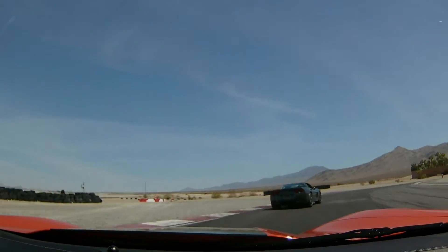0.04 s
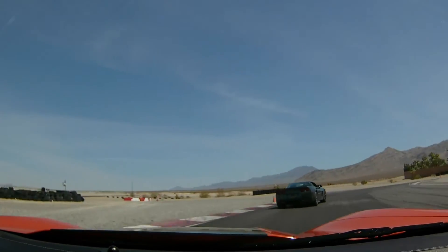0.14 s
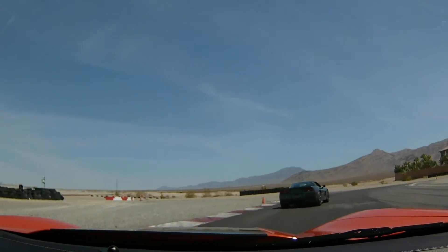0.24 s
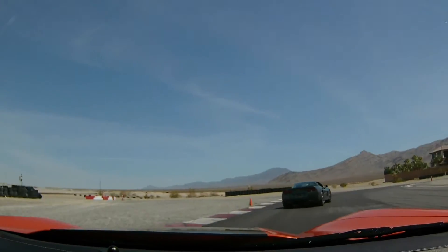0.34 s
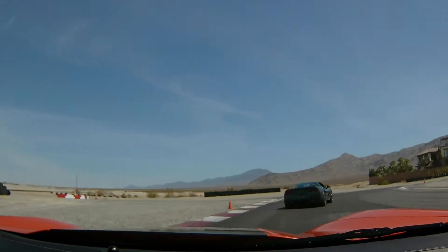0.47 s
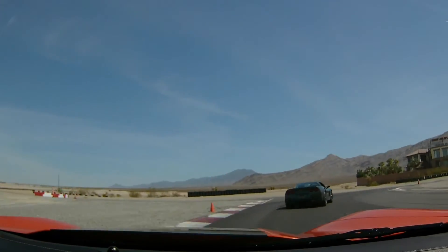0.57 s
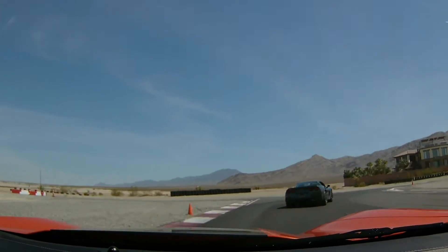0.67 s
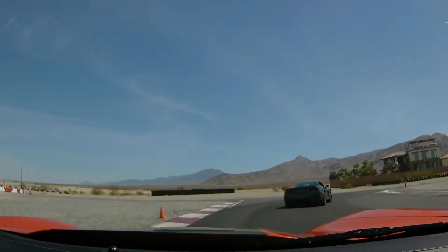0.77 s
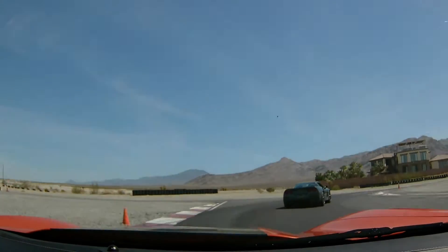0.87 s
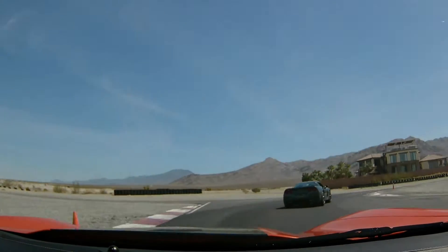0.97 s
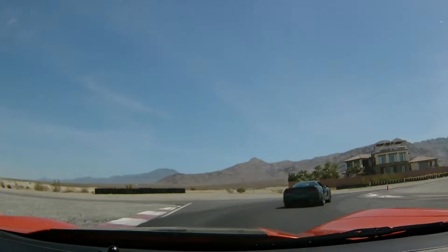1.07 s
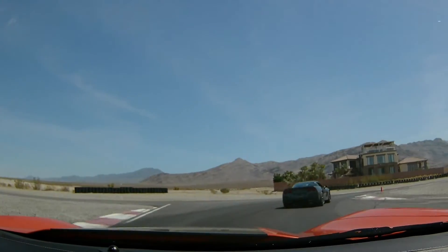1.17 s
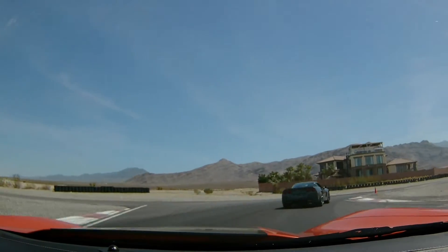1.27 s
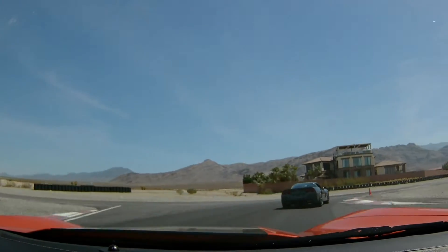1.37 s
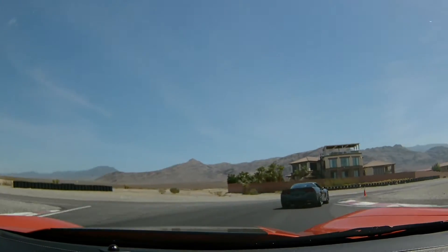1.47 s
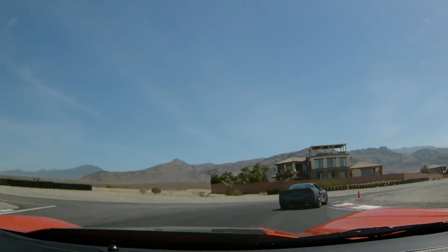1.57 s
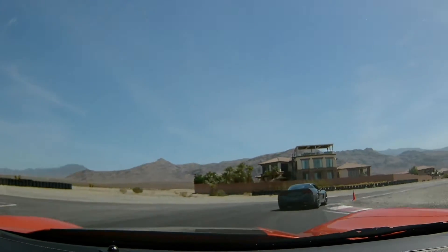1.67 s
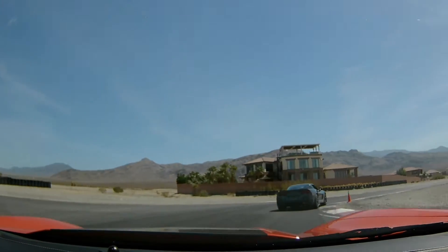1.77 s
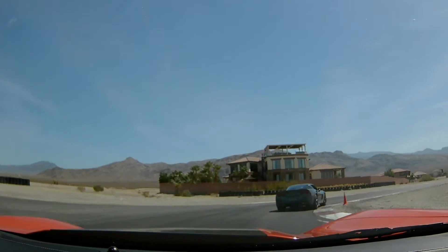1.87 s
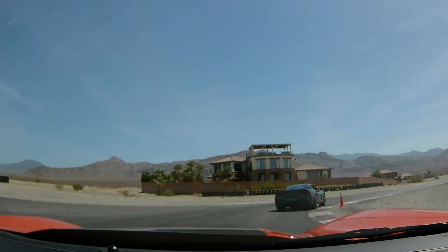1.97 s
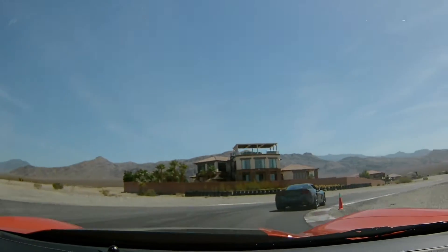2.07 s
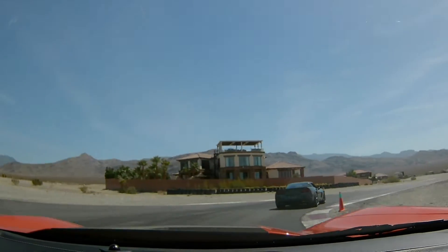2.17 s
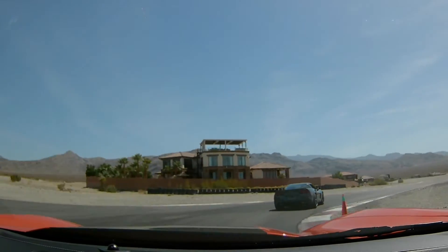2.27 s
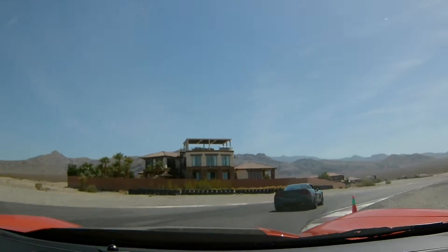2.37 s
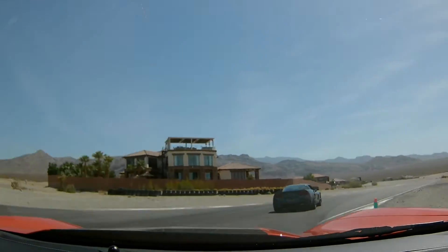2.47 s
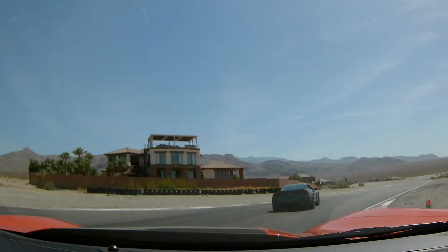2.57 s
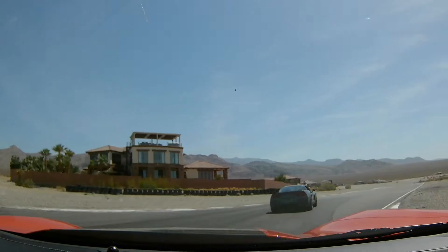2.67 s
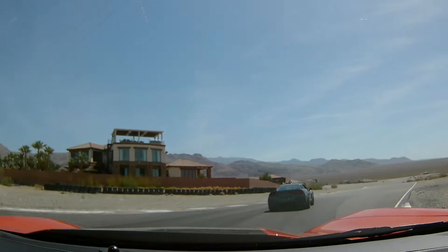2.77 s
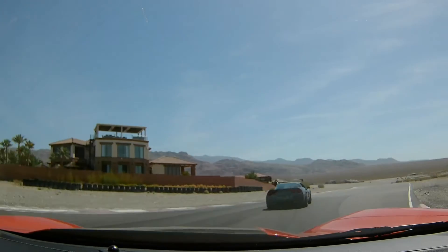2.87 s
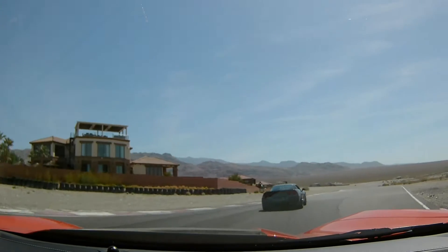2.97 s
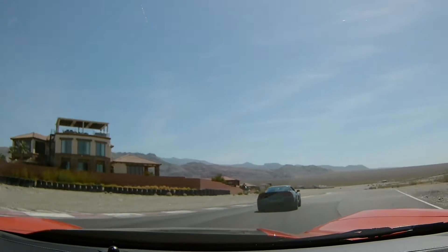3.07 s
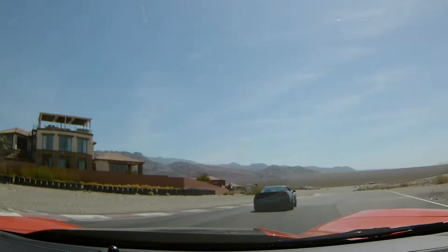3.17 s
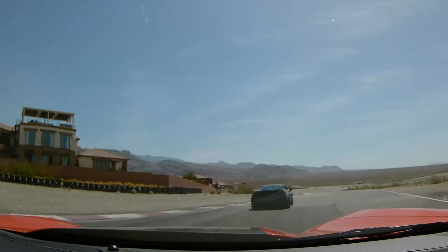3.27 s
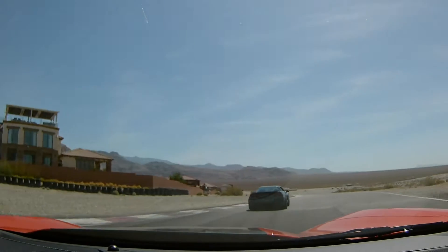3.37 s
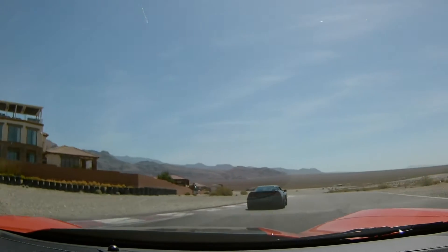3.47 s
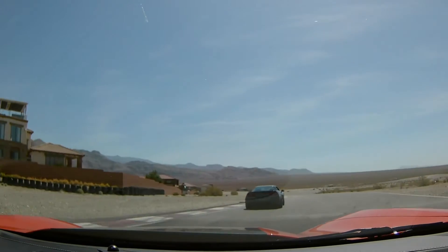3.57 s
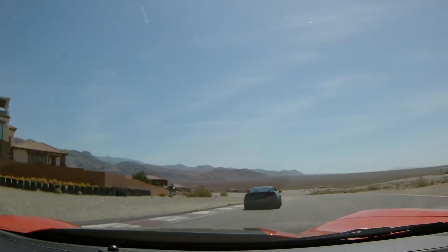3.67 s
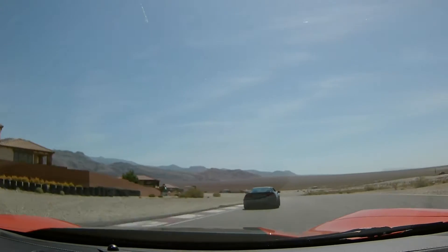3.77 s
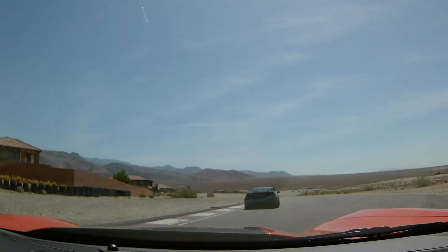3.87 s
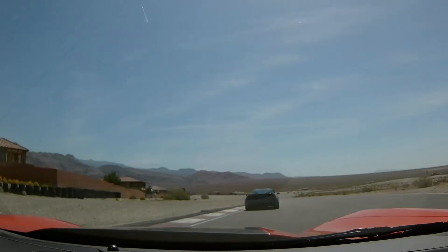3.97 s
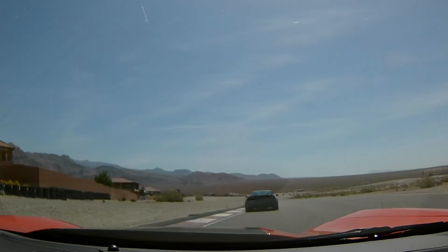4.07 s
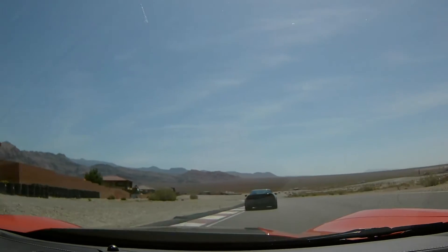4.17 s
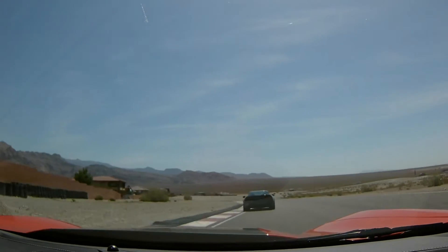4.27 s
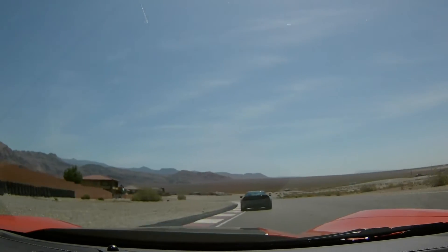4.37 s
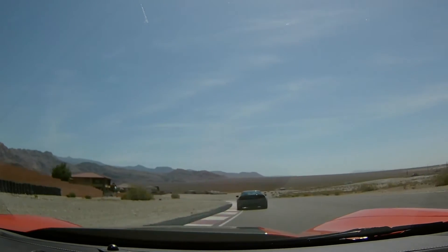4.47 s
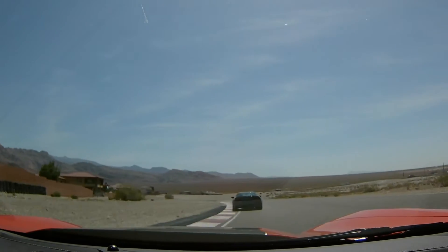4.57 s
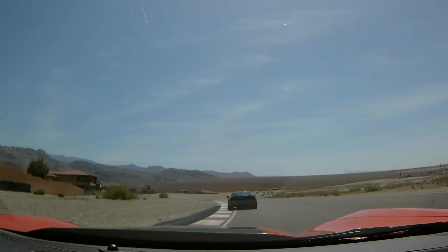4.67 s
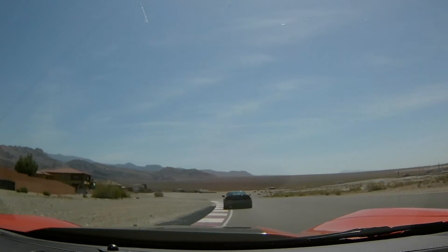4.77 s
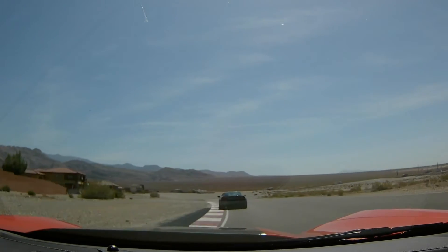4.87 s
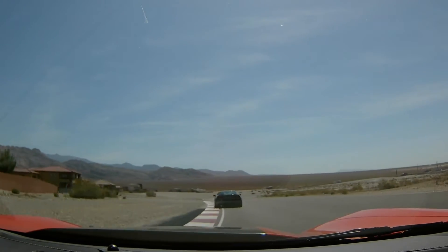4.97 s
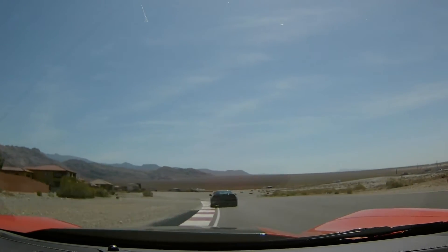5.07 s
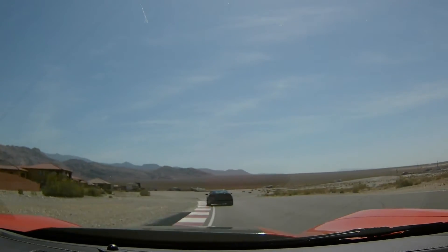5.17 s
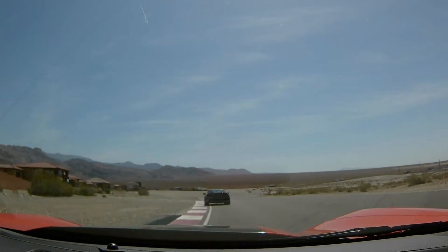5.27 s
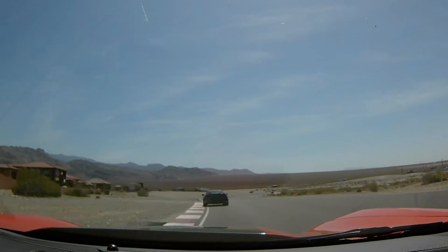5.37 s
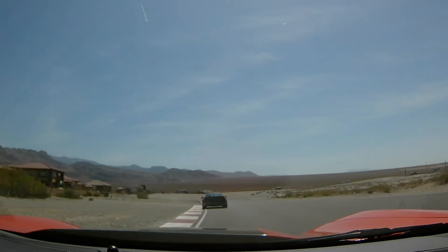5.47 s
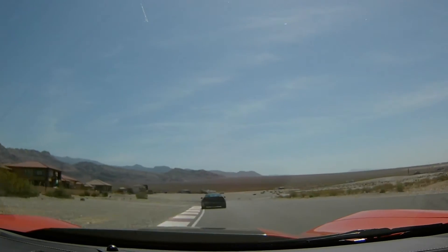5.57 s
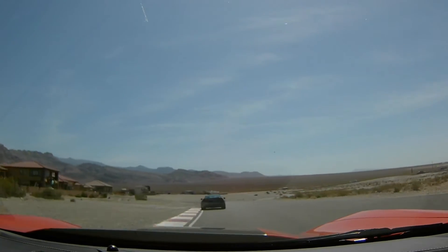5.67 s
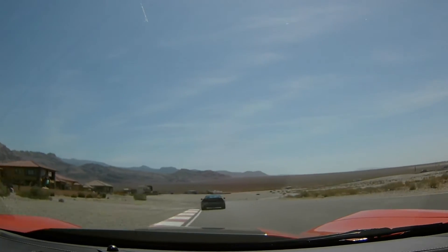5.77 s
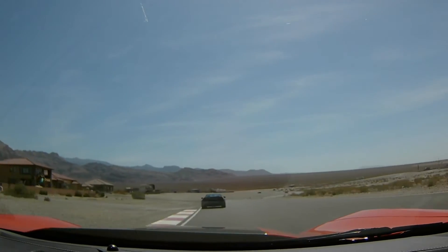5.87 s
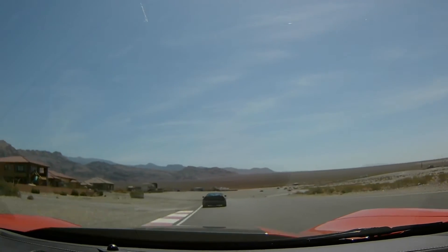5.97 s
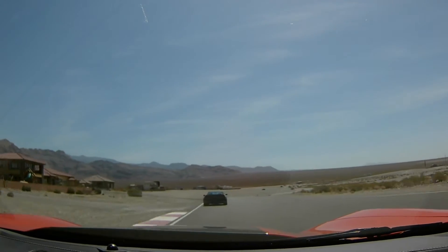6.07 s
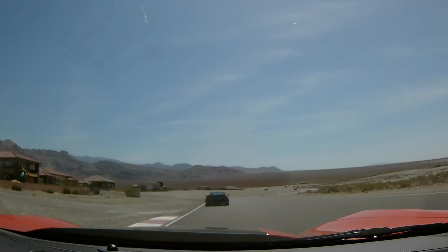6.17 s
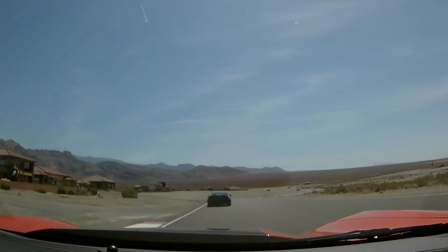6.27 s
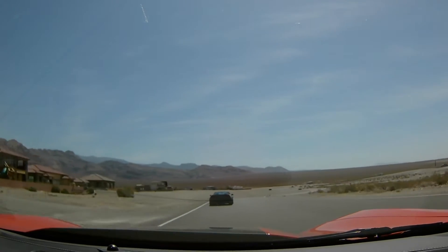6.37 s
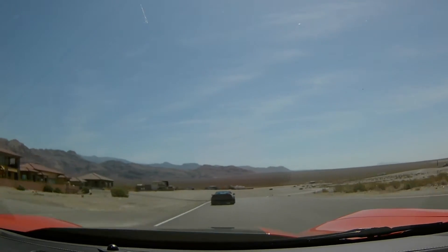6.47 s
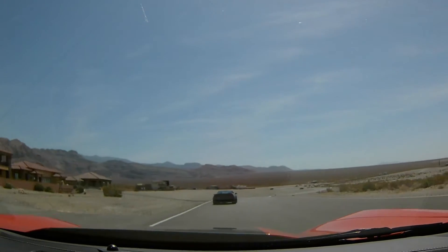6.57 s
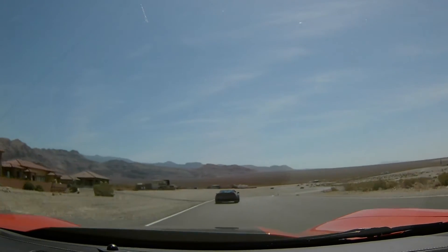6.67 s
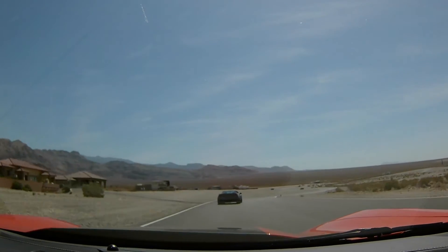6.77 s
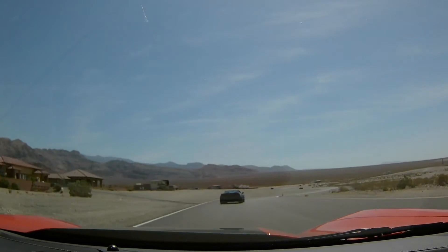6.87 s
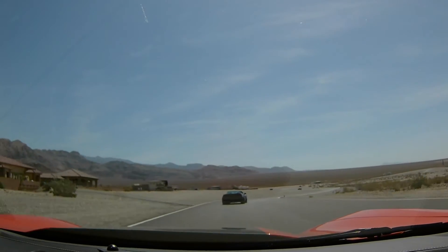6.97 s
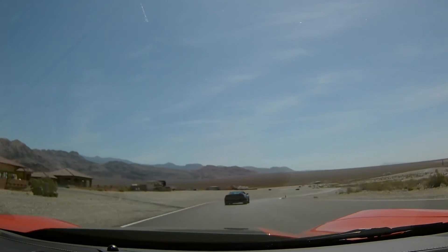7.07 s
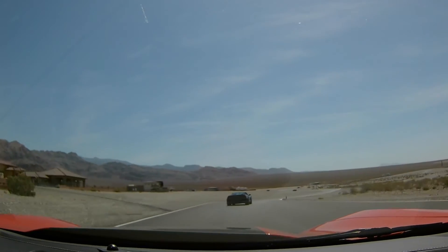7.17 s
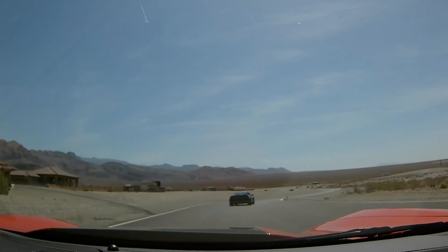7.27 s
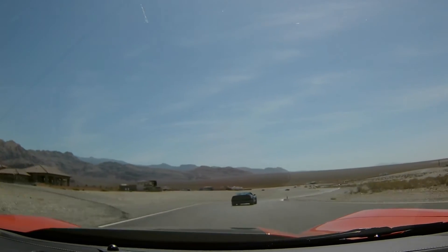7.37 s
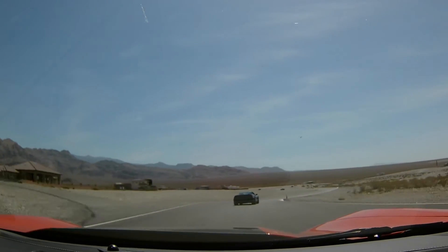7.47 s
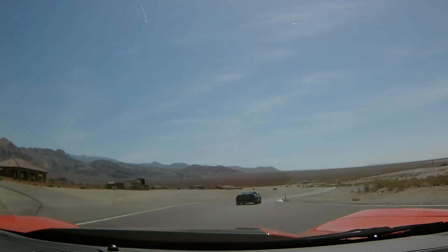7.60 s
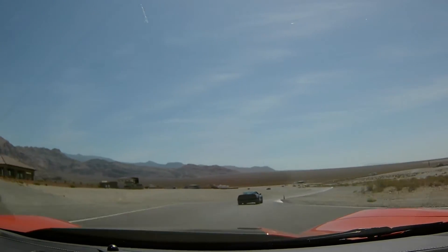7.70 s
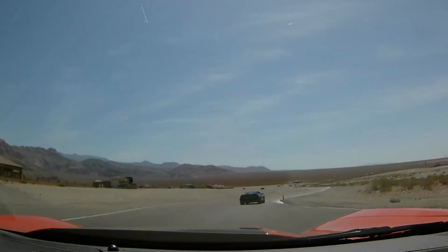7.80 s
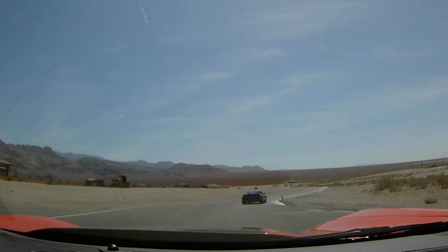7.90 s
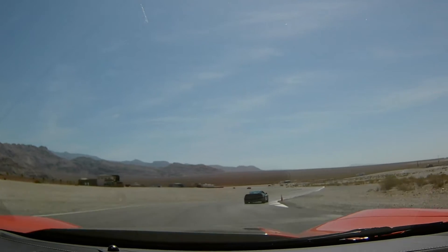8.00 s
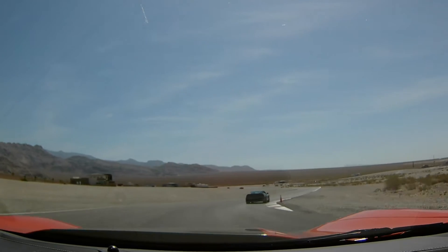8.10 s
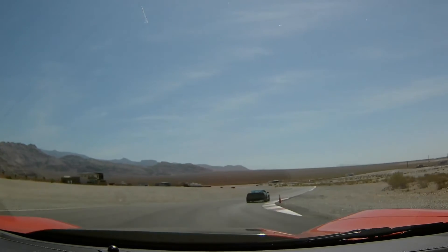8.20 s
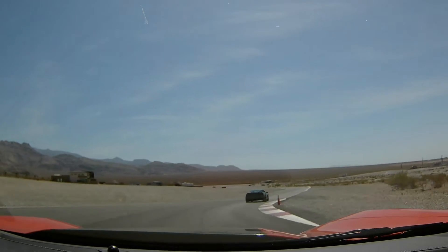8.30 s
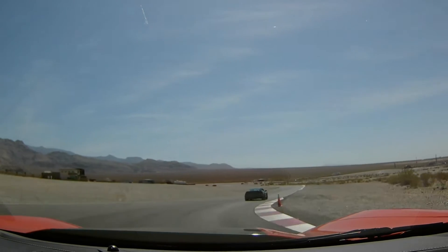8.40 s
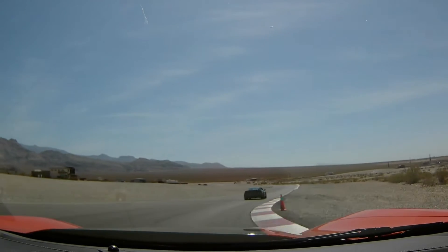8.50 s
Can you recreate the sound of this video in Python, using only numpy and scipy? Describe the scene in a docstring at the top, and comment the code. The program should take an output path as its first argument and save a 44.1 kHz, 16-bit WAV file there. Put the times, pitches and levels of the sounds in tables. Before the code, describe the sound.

Heard inside a sports car on a track: tyre roar and low rumble over a barely audible coasting engine, then the V8 comes in at part throttle through a bend with faint tyre squeals and one tiny trim click. It goes flat out, revs climbing in a booming snarl, drops in pitch at one quick upshift, climbs again, and eases off at the end. Wind grows with speed.

```python
"""A low, faint engine note coasts over tyre roar and road rumble; then a V8 sports car pulls through a bend at
part throttle and goes flat out with one quick upshift, all heard from the driver's seat.
The engine is a stack of sine harmonics locked to the crank, booming through resonances as the revs sweep.
Tyres, wind, floor drone and hiss are shaped noise; roar, wind and drone grow with speed.
Tyre squeals are narrow wavering bands; a piece of trim clicks once in the bend as a set of decaying modes."""
import sys
import numpy as np
from scipy import signal
from scipy.fft import rfft, irfft, next_fast_len
from scipy.io import wavfile
from scipy.ndimage import uniform_filter1d, minimum_filter1d

SR = 44100
rng = np.random.default_rng(int(sys.argv[2]) if len(sys.argv) > 2 else 0)


def transcribe(u):
    """Save the signal u as a 16-bit wav file named by the first command-line argument.

    u: samples, shape (n,) or (channels, n), limited to [-1, 1]; the rate is SR.
    q: integer samples, one column per channel.
    """
    v = np.clip(np.atleast_2d(u).T, -1, 1)
    q = np.round(v * 32767).astype(np.int16)
    wavfile.write(sys.argv[1], SR, q)


N = 376613
TIME = np.arange(N) / SR

# engine cycle = two crank turns = eight firings: (time [s], cycle rate [Hz])
CYCLE_RATE = [(0.0, 30.0), (0.24, 29.3), (0.43, 29.6), (0.69, 28.7), (0.9, 29.3), (1.05, 28.9),
              (1.93, 29.0), (2.78, 30.3), (3.57, 31.8), (3.71, 32.3), (4.83, 38.3), (5.56, 42.4),
              (6.25, 46.0), (6.35, 46.3), (6.42, 45.9), (6.45, 45.1), (6.52, 40.7), (6.57, 38.7),
              (6.59, 38.5), (6.78, 39.3), (8.11, 44.1), (8.23, 43.3), (8.47, 43.4), (8.54, 42.6)]
# coasting, part throttle in the bend, flat out, then easing off: (time [s], engine load [dB])
ENGINE_LOAD = [(0, -31), (.74, -31.5), (.89, -16.5), (1.6, -13), (2.85, -11), (3.35, -13), (3.6, -9.5),
               (3.85, -4), (4.4, 0), (6.4, 0), (6.65, -0.5), (7.3, 0), (8.1, 0), (8.3, -3), (8.54, -10.5)]
# strong harmonics of the cycle: 8, 16 and 24 are the firing note and its overtones,
# the rest the burble of the banks: (harmonic number)
STRONG_HARMONICS = (3, 4, 5, 6, 7, 8, 10, 14, 16, 24)
# each strong harmonic with no load: (level [dB])
COAST_LEVELS = [-42, -38.5, -49.5, -43, -44.5, -48.5, -45, -52.5, -52, -52.5]
# each strong harmonic at full load, between resonances: (level [dB])
PULL_LEVELS = [-38.5, -34, -37, -44, -36.5, -39, -41, -41.5, -40.5, -45]
# resonances each harmonic sweeps through, the same in every gear:
# harmonic number: (centre [Hz], width [Hz], level at full load [dB])
BOOM_RESONANCES = {3: [(103, 9.5, -28), (122.1, 23, -17)], 4: [(130.9, 16, -22), (167.3, 17, -29)],
                   5: [(190, 9, -28), (219.3, 19.8, -22.5)], 6: [(235.7, 48.5, -24), (274, 20, -23)],
                   7: [(249, 55, -29.5)], 8: [(237.4, 21, -13), (262, 15.3, -14.5), (280, 39, -20),
                   (313.2, 27.8, -19.5), (347, 19, -29.5), (373, 22, -17.5)], 10: [(337.7, 20, -25.5),
                   (377.3, 26, -27.5)], 14: [(486, 34, -32), (566.6, 52, -33)], 16: [(592, 23, -32.5),
                   (657, 49.6, -23.5), (724, 58, -29)], 24: [(1063, 78, -35.5)]}
# pipe colour of the weaker harmonics at full load: (frequency [Hz], level of each [dB])
PIPE_COLOUR = [(60, -38), (270, -32), (320, -38), (380, -32), (430, -38), (520, -37), (650, -39),
               (800, -39), (960, -46), (1070, -44), (1250, -49), (1780, -49), (1950, -61), (2600, -68)]
# harmonics that the uneven firing of each bank favours or starves: (harmonic number)
BANK_HARMONICS = (2, 9, 11, 12, 13, 15, 17, 18, 19, 20, 21, 22, 23, 25)
# how far each of those is favoured or starved: (gain [dB])
BANK_GAINS = [4.5, -4.5, 0, -2, -1, 2.5, -1.5, 2, -3, 2, 1, -2, 2, 2.5]
# tyre roar in the bend, shape only: (frequency [Hz], relative level [dB])
BEND_TYRE_SPECTRUM = [(60, -25), (140, -22), (280, -4), (370, -5.5), (480, 0.5), (590, -9.5), (700, 2),
                      (820, -4.5), (950, -10.5), (1300, -12.5), (1800, -17.5), (2000, -30.5), (2700, -37.5),
                      (4000, -61)]
# tyre roar at speed, shape only: (frequency [Hz], relative level [dB])
FAST_TYRE_SPECTRUM = [(60, -9.5), (130, -12), (300, 6.5), (420, 7), (560, 6.5), (750, 6.5), (950, 1),
                      (1300, 1), (1750, -3), (2000, -15), (2700, -13), (4000, -38)]
# wind and intake air, shape only: (frequency [Hz], relative level [dB])
WIND_SPECTRUM = [(800, -19.5), (1600, 0.5), (2200, 3.5), (2800, -1.5), (3300, -4), (4200, -8), (5000, -14),
                 (6000, -24), (8000, -26)]
# gusts that move the wind around its steady level: (time [s], gain [dB])
WIND_GUSTS = [(0, 1.5), (.35, 0.5), (1.6, 0), (2.2, 1.5), (2.9, 4), (3.5, 2), (4.3, -3.5), (4.85, 2.5),
              (5.8, -2.5), (6.2, -1), (7.2, -.5), (8.1, 0.5), (8.54, 1.5)]
# road noise through the floor, shape only: (frequency [Hz], relative level [dB])
DRONE_SPECTRUM = [(45, -9), (80, -3), (115, -1.5), (165, -1), (260, -5), (420, -25)]
# the body shaking, shape only: (frequency [Hz], relative level [dB])
RUMBLE_SPECTRUM = [(10, -22), (22, -8), (35, -1.5), (50, -7.5), (70, -13.5), (100, -20), (160, -23.5),
                   (260, -27), (500, -49)]
# how hard the road shakes the body: (time [s], level [dB])
ROAD_BUMPS = [(0, -27), (1.35, -31.5), (1.6, -26.5), (2.4, -19), (3, -22.5), (4.6, -24), (5.25, -18.5),
              (6, -22.5), (7, -18.5), (8.1, -15.5), (8.54, -16.5)]
# faint squeals in the bend, from the tyres scrubbing:
# (middle [s], length [s], pitch [Hz], rate of wavering [changes/s], level [dB])
TYRE_SQUEALS = [(0.948, 0.75, 1804, 25, -55.5), (2.65, 0.55, 802, 64.7, -39), (3.203, .5, 766, 70.7, -38.5)]
# the tiny slips that make up the trim click: (time [s], drive level [dB])
TRIM_SLIPS = [(2.8215, -34), (2.8302, -6), (2.8332, -24)]
# ringing modes of the trim: (frequency [Hz], relative level [dB], 60 dB decay time [s])
TRIM_MODES = [(1314, -11.5, 0.017), (2240, -2.5, 0.008), (2510, -2, 0.01), (2690, -16, 0.02),
              (3430, -24, .012), (4200, -28, 0.031)]
# faint top-treble hiss, shape only: (frequency [Hz], relative level [dB])
HISS_SPECTRUM = [(3000, -12.5), (6000, -10.5), (7200, -6.5), (8200, -1.5), (12000, -0.5), (15500, 3.5)]
# the hiss coming and going: (time [s], level [dB])
HISS_LEVELS = [(0, -69), (.85, -69.5), (1.1, -67.5), (1.8, -66), (2.5, -62), (3.1, -64), (3.58, -67),
               (3.72, -58), (4.4, -60.5), (5.2, -52), (5.95, -59.5), (6.7, -53.5), (7.8, -54),
               (8.54, -57.5)]

# the upshift: when it starts and ends [s], and how much taller the new gear is [ratio]
SHIFT_START_S, SHIFT_END_S, GEAR_STEP = 6.43, 6.58, 1.2
# level at bend speed [dB], and rise per doubling of speed [dB]
ROAR_DB, ROAR_RISE_DB = -36.5, 13.5
WIND_DB, WIND_RISE_DB = -61, 24
DRONE_DB, DRONE_RISE_DB = -37.5, 14
INTAKE_DB = -52.5  # air drawn through the intake at full load
EDGE_HZ = 15850  # top of the audible band


def gain_of(db):
    """Decibels to gain."""
    return 10 ** (np.asarray(db) / 20)


def evened(x):
    """Scales to rms 1."""
    return x / np.sqrt(np.mean(x ** 2) + 1e-20)


def curves(rows):
    """Each column of a table, drawn out over time."""
    s, *columns = np.transpose(rows)
    return [np.interp(TIME, s, c) for c in columns]


def read(points, hz):
    """A spectrum's dB at the given frequencies, straight between points on a log-frequency axis."""
    f, db = np.transpose(points)
    return np.interp(np.log(hz + 1), np.log(f), db)


def noise(points):
    """Noise of rms 1 with the given spectrum."""
    size = next_fast_len(N)
    hz = np.fft.rfftfreq(size, 1 / SR)
    skirt = 1 / (1 + (hz / points[-1][0]) ** 4)  # rolls off beyond the last point
    spectrum = rfft(rng.standard_normal(size)) * gain_of(read(points, hz)) * skirt
    return evened(irfft(spectrum, size)[:N])


def drift(per_s):
    """Random wander of rms 1 that picks a new target so many times a second."""
    knots = rng.standard_normal(8192)
    return evened(np.interp(TIME * per_s, np.arange(len(knots)), knots))


def patchy(x, depth_db):
    """Eddies: patches a few hundred Hz wide and some tens of ms long come and go; rms 1."""
    z = signal.stft(x, nperseg=1024)[2]
    patches = uniform_filter1d(rng.standard_normal(z.shape), size=5, axis=0)
    patches = evened(uniform_filter1d(patches, size=3, axis=1))
    return evened(signal.istft(z * gain_of(depth_db * patches))[1][:N])


def crank(jitter=0.0012):
    """Cycle rate and cycles turned; combustion makes the speed tremble by the rms fraction jitter."""
    hz = curves(CYCLE_RATE)[0]
    return hz, np.cumsum(hz * (1 + jitter * drift(45))) / SR


def boom(hz, turns, rough=0.1):
    """Strong exhaust harmonics: lines locked to the crank, growing with load and swelling in each resonance."""
    out, load = np.zeros(N), gain_of(curves(ENGINE_LOAD)[0])
    for k, coast_db, pull_db in zip(STRONG_HARMONICS, COAST_LEVELS, PULL_LEVELS):
        power = gain_of(pull_db) ** 2
        for centre_hz, width_hz, db in BOOM_RESONANCES[k]:
            detune = np.square(2 * (k * hz - centre_hz) / width_hz)
            power = power + gain_of(db) ** 2 / (1 + np.square(np.square(detune)))  # flat top, steep sides
        height = np.sqrt(gain_of(coast_db) ** 2 + load ** 2 * power)
        line = np.sin(2 * np.pi * (k * turns + rng.random()))
        out += height * (1 + rough * drift(40)) * line
    return np.sqrt(2) * out  # levels are rms


def snarl(hz, turns, rough_hz=1700, dull_db=18, mode_hz=22, count=56):
    """The other harmonics: shaped by the pipes, brighter with revs, flaring across the cabin's dense modes."""
    out, coarse = np.zeros(N), np.arange(0, N, 512)
    bank = dict(zip(BANK_HARMONICS, BANK_GAINS))
    below_top = 1 - hz[coarse] / hz.max()
    cabin = rng.standard_normal(256)  # one random peak or null every mode_hz
    for k in set(range(2, count)) - set(STRONG_HARMONICS):
        line_hz = k * hz[coarse]
        octaves_up = np.log2(np.maximum(line_hz / 550, 1))
        db = read(PIPE_COLOUR, line_hz) + bank.get(k, 0) - dull_db * below_top * octaves_up
        # the cabin's peaks and nulls deepen with frequency
        depth_db = np.minimum(line_hz / 170, 4.5)
        ripple = np.minimum(np.interp(line_hz / mode_hz, np.arange(len(cabin)), cabin), 1)
        height = gain_of(db + depth_db * ripple)
        # no two firings are quite alike, so each harmonic's phase strays
        steps = rng.standard_normal(len(coarse)) * line_hz / rough_hz
        stray = np.cumsum(steps) + 2 * np.pi * rng.random()
        height, stray = (np.interp(TIME, TIME[coarse], c) for c in (height, stray))
        out += height * np.sin(2 * np.pi * k * turns + stray)
    return np.sqrt(2) * gain_of(curves(ENGINE_LOAD)[0]) * out


def road_speed(hz):
    """Speed in doublings above bend speed: revs through the gearing, carried on through the shift."""
    geared = hz * np.where(TIME < SHIFT_END_S, 1, GEAR_STEP)
    in_gear = (TIME < SHIFT_START_S) | (TIME > SHIFT_END_S)
    return np.log2(np.interp(TIME, TIME[in_gear], geared[in_gear]) / hz.min())


def shift_surge(surge_db=3.0, lag_s=.04, length_s=0.058):
    """The roar swells briefly during the shift, in dB."""
    return surge_db * np.exp(-((TIME - SHIFT_START_S - lag_s) / length_s) ** 2)


def rush(hz, turns, flicker, bend_extra_db=2, pulsing=0.061, gust_db=1.1, eddy_db=3, flicker_db=1.14):
    """Tyre roar and wind rise with speed, intake air with load; under load they throb with the engine."""
    doublings, load = road_speed(hz), gain_of(curves(ENGINE_LOAD)[0])
    roar_db = ROAR_DB + ROAR_RISE_DB * doublings + shift_surge()
    wind_db = WIND_DB + WIND_RISE_DB * doublings + curves(WIND_GUSTS)[0]
    air_level = np.hypot(gain_of(wind_db), gain_of(INTAKE_DB) * load)
    # the tyres change voice as the bend opens out
    straight = np.clip((TIME - 3) / 2.0, 0, 1)
    bend_tyres = np.sqrt(1 - straight) * gain_of(bend_extra_db) * noise(BEND_TYRE_SPECTRUM)
    tyres = bend_tyres + np.sqrt(straight) * noise(FAST_TYRE_SPECTRUM)
    air = air_level * gain_of(flicker_db * flicker) * patchy(noise(WIND_SPECTRUM), eddy_db)
    # eight firings a cycle, plus a slower beat of three
    pulses = np.cos(2 * np.pi * 8 * turns) + np.cos(2 * np.pi * 3 * turns)
    throb = 1 + pulsing * load * pulses
    return (gain_of(roar_db) * patchy(tyres, depth_db=1.5) + air) * throb * gain_of(gust_db * drift(25))


def drone(hz):
    """The rolling tyres drone through the floor, louder with speed."""
    return gain_of(DRONE_DB + DRONE_RISE_DB * road_speed(hz)) * noise(DRONE_SPECTRUM)


def rumble(jolt_db=0.76):
    """The body shakes on its springs, as hard as the bumps in the road push it."""
    shake = noise(RUMBLE_SPECTRUM)
    # flatten the noise's own swells so that the bumps set the level
    strength = np.sqrt(uniform_filter1d(uniform_filter1d(shake ** 2, size=4000), size=2600))
    return gain_of(curves(ROAD_BUMPS)[0] + jolt_db * drift(8)) * shake / strength


def squeals():
    """Scrubbing tyres: each squeal is a narrow, wavering band that swells and fades."""
    out = np.zeros(N)
    for middle_s, length_s, hz, waver_per_s, db in TYRE_SQUEALS:
        swell = np.exp(-np.square(np.square(2 * (TIME - middle_s) / length_s)))
        waver = drift(waver_per_s) + 1j * drift(waver_per_s)
        band = waver * np.exp(2j * np.pi * hz * TIME)
        out += gain_of(db) * swell * band.real
    return out


def trim_click(rise_s=0.00073):
    """Hard plastic slips and rings for a few milliseconds, its top end softened."""
    out, t = np.zeros(N), np.arange(2048) / SR
    ring = sum(gain_of(db - 60 * t / t60) * np.sin(2 * np.pi * hz * t) for hz, db, t60 in TRIM_MODES)
    ring *= 1 - np.exp(-(t / rise_s) ** 2)
    for s, db in TRIM_SLIPS:
        out[round(s * SR):][:len(t)] += gain_of(db) * ring
    return signal.sosfilt(signal.butter(6, 4900, fs=SR, output="sos"), out)


def hiss(flicker, flicker_db=1.1, grain_db=3.0, swell_db=1.1):
    """A faint, grainy hiss in the top treble: noise with fast and slow random level changes."""
    waver_db = flicker_db * flicker + swell_db * drift(12) + grain_db * drift(270)
    return gain_of(curves(HISS_LEVELS)[0] + waver_db) * noise(HISS_SPECTRUM)


def scene():
    """Everything that reaches the cabin."""
    hz, turns = crank()
    flicker = drift(22)  # wind, intake air and hiss flicker together
    engine = boom(hz, turns) + snarl(hz, turns)
    road = rush(hz, turns, flicker) + drone(hz) + rumble() + squeals()
    return (engine + road + trim_click() + hiss(flicker))[None]


def record(dry):
    """A limiter eases down the highest peaks; then a steep low-pass sets the band limit."""
    allowed = np.minimum(1, .82 / (abs(dry[0]) + 1e-9))
    limited = dry * uniform_filter1d(minimum_filter1d(allowed, size=600), size=600)
    low_pass = signal.firwin(511, EDGE_HZ, window=("kaiser", 9), fs=SR)
    return signal.oaconvolve(limited, low_pass[None], "same")


dry = scene()
out = record(dry)
transcribe(out)
```